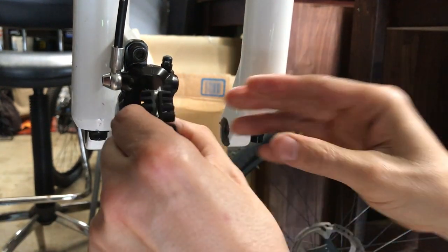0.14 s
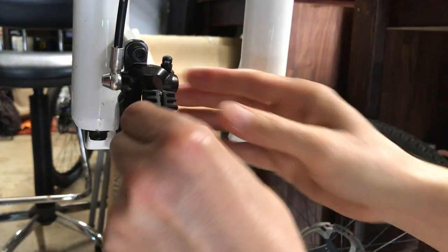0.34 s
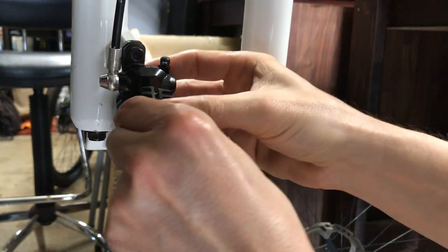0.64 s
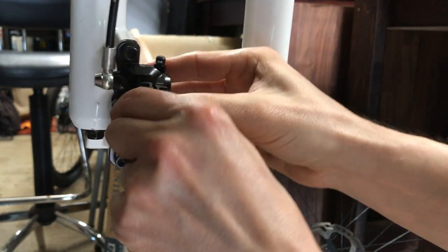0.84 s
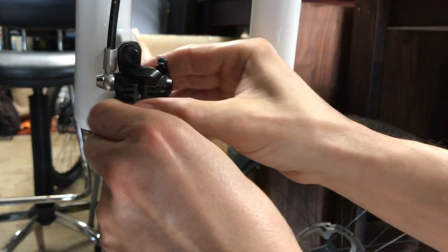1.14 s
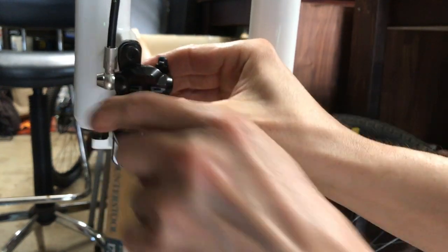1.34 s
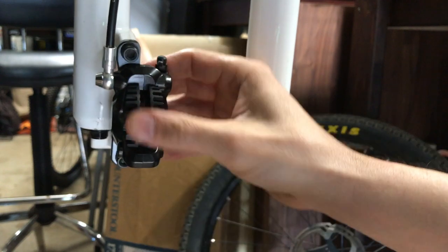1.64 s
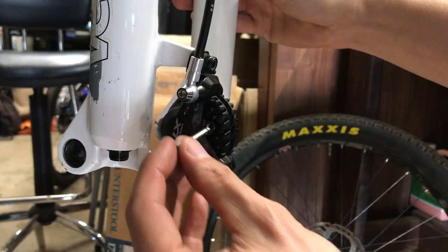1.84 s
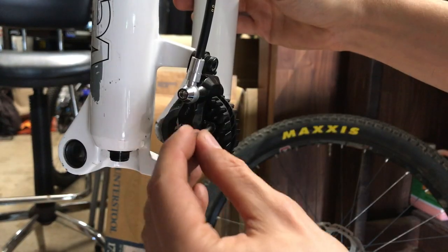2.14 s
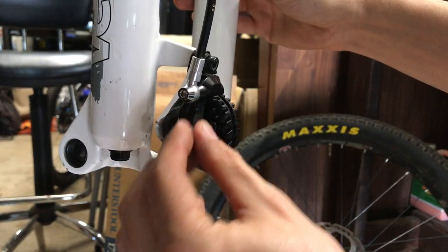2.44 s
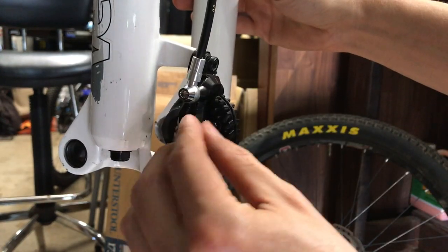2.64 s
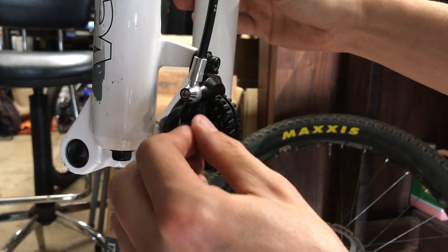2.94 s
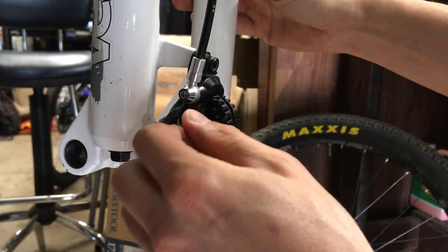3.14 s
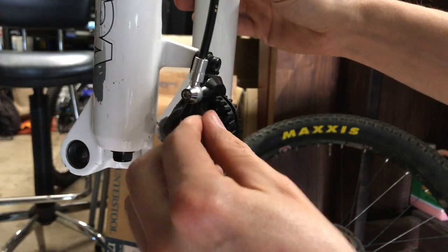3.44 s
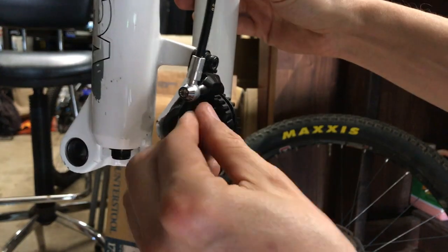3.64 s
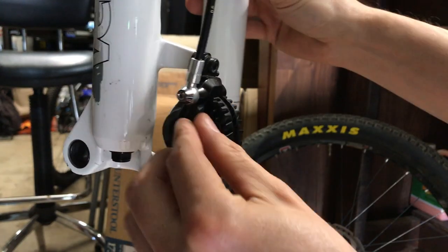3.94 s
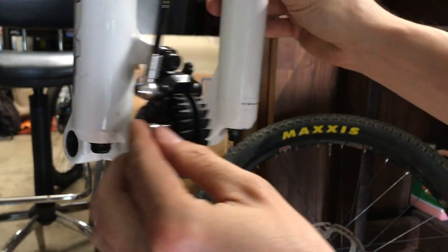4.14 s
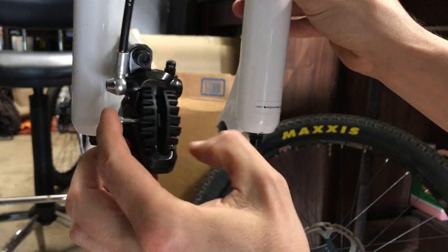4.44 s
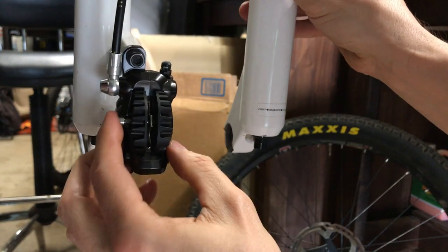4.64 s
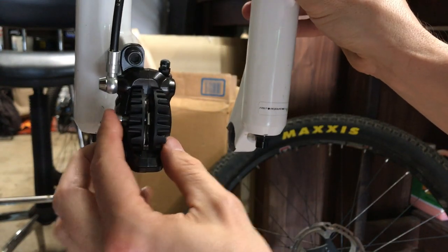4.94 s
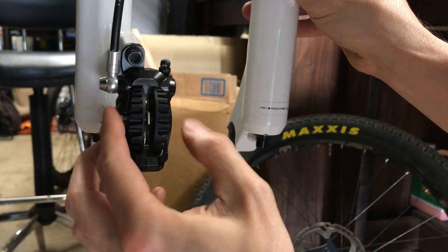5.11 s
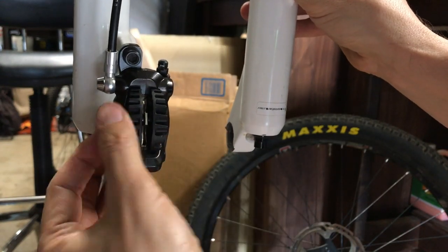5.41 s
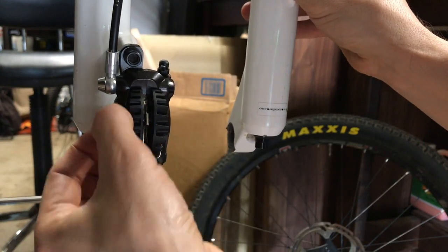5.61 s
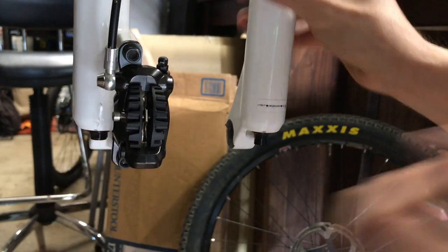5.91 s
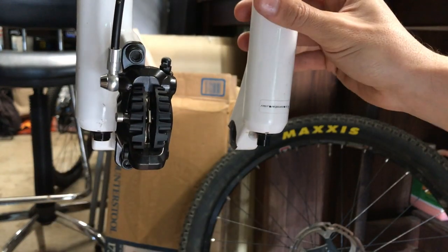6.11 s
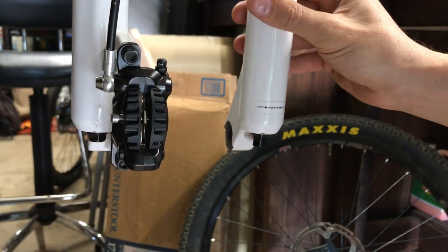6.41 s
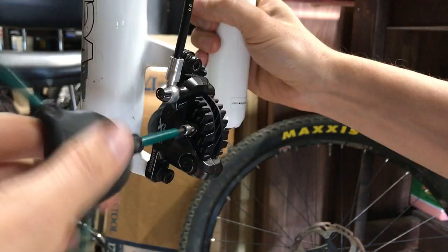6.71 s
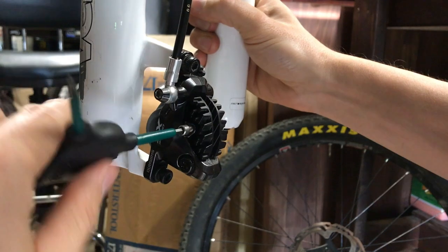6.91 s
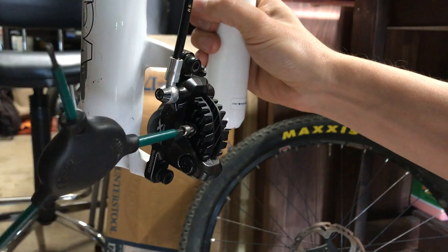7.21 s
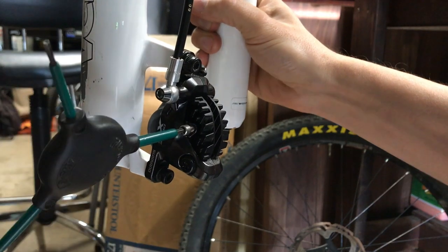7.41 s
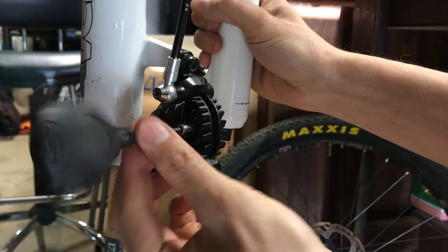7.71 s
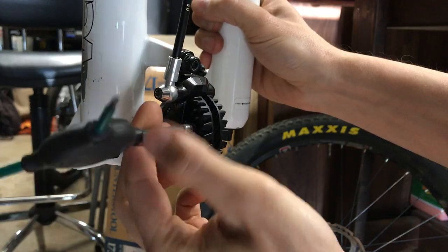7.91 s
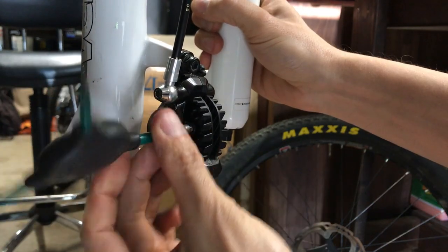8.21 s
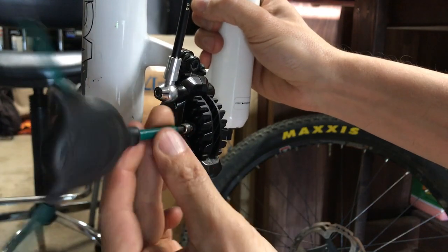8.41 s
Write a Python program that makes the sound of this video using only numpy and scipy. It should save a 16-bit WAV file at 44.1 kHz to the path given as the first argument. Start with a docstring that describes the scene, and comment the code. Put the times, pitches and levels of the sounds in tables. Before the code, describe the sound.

Metal-backed brake pads click and snap sharply into a bicycle caliper, then a small pin ticks in and a hex key turns faintly in a quiet workshop.

```python
"""Fitting bicycle brake pads

Steel-backed brake pads are pushed into a bicycle caliper, a retaining pin is slid in and a hex key turns it.
Each contact is a burst of tiny impacts exciting the short damped modes of caliper and fork; slides are dense
random grains through the same modes. A small workshop answers the contacts with a decaying tail of echoes.
Behind them lie filtered noises: air, hum, a far engine, hiss, faint tones and a dull knock on wood."""
import sys
import numpy as np
from scipy import signal
from scipy.fft import rfft, irfft, next_fast_len
from scipy.io import wavfile
from scipy.ndimage import uniform_filter1d

SR = 44100
rng = np.random.default_rng(int(sys.argv[2]) if len(sys.argv) > 2 else 0)


def master_out(mix):
    """Clip the mix to full scale and print it as 16-bit PCM to the path in sys.argv[1]."""
    frames = np.transpose(np.atleast_2d(mix))
    ceiling = np.clip(frames, -1, 1)
    pcm = np.round(ceiling * 32767).astype(np.int16)
    wavfile.write(sys.argv[1], SR, pcm)


N = 377496

# distant traffic: (time [s], swell of the low air noise [dB], level of the engine drone [dB])
TRAFFIC = [(0, 0, -78), (1, 0.5, -68.5), (3.2, 3, -81), (3.697, -1, -74.5), (6.601, -1.5, -83.5),
           (7.3, -1, -69.5), (7.799, 0, -73), (8.56, 1.5, -61.5)]


def gain_of(db):
    """Amplitude ratio of a level in decibels."""
    return 10 ** (np.asarray(db) / 20)


def evened(x):
    """Normalization to unit root-mean-square."""
    return x / np.sqrt(np.mean(x ** 2) + 1e-20)


def read(points, hz):
    """Interpolation along a logarithmic frequency axis."""
    f, value = np.transpose(points)
    return np.interp(np.log(hz + 1), np.log(f + 1), value)


def add(mix, start_s, sound):
    """Superposition: a sound is summed into the mix from its start time."""
    part = mix[round(start_s * SR):][:len(sound)]
    part += sound[:len(part)]


def resonate(x, hz, width_hz):
    """A damped resonator as one complex pole, of gain about 1 at its centre."""
    pole = np.exp((2j * np.pi * hz - np.pi * width_hz) / SR)
    return 2 * signal.lfilter([1 - abs(pole)], [1, -pole], x).real


def resonate_twice(x, hz, width_hz):
    """Two equal resonators in cascade, for steeper skirts."""
    return resonate(resonate(x, hz, width_hz), hz, width_hz)


def narrow_noise(bands):
    """Narrow-band noise: random excitation of sharp resonances gives fuzzy, wavering tones."""
    noise = rng.standard_normal(N)
    return sum(gain_of(db) * evened(resonate_twice(noise, hz, width_hz)) for hz, width_hz, db in bands)


def air():
    """Broadband noise from random short-time spectra, shaped in frequency; the low part swells with traffic."""
    # long-term spectrum of the air noise: (frequency [Hz], relative level per Hz [dB])
    air_spectrum = [(24, -40), (38, 1), (62, -0.5), (90, -10), (122, -4), (230, -11), (473, -19.5),
                    (830, -15), (1350, -19), (1900, -26.5), (3500, -33.5), (13000, -39), (16000, -45)]
    level_db, patch_db = -63.5, 0.55
    frames, hz = N // 256 + 5, np.fft.rfftfreq(1024, 1 / SR)
    real, imaginary, patches = rng.standard_normal((frames, 513, 3)).T
    patches = uniform_filter1d(patches, 12, 0)  # smoothed over frequency, then over time
    patches = evened(uniform_filter1d(patches, 14, 1))
    swell_db = np.interp(np.arange(frames) * 256 / SR, *np.transpose(TRAFFIC)[:2])
    low_share = 1 / (1 + (hz[:, None] / 2200) ** 4)
    shape_db = read(air_spectrum, hz)[:, None] + patch_db * patches + low_share * swell_db
    spectra = (real + 1j * imaginary) * gain_of(shape_db)
    return gain_of(level_db) * evened(signal.istft(spectra, nperseg=1024, noverlap=768)[1][:N])


def hum_and_whine():
    """Narrow-band noise: wavering machinery hum and a faint steady treble band."""
    # machinery: (centre [Hz], width of each resonator [Hz], level [dB])
    hum_bands = [(55, 27, -68.5), (118.7, 1.7, -70)]
    # treble band: (centre [Hz], width of each resonator [Hz], level [dB])
    whine_bands = [(13400, 450, -88.5)]
    return narrow_noise([*hum_bands, *whine_bands])


def drone():
    """Amplitude modulation of narrow-band noise: a far engine comes and goes."""
    # engine tones: (centre [Hz], width of each resonator [Hz], relative level [dB])
    drone_bands = [(159.85, 12, -1.5), (251, 5.7, -10)]
    time_s, _, db = np.transpose(TRAFFIC)
    return gain_of(np.interp(np.arange(N) / SR, time_s, db)) * narrow_noise(drone_bands)


def hiss():
    """Band-pass noise, gated: the treble hiss steps up for a while."""
    # (start [s], end [s], level before the edge fades [dB])
    hiss_spans = [(1.433, 1.751, -71.5), (2.903, 3.257, -71)]
    out = np.zeros(N)
    treble = signal.butter(2, [2500, 15000], "bandpass", fs=SR, output="sos")
    for start, end, db in hiss_spans:
        noise = signal.sosfilt(treble, rng.standard_normal(round((end - start) * SR)))
        add(out, start, gain_of(db) * evened(noise) * signal.windows.tukey(len(noise), .05))
    return out


def faint_tones():
    """Narrow-band noise under a swelling and fading envelope."""
    # squeak of the turning pin, far hum: (start [s], length [s], level before the fades [dB], centre [Hz])
    tone_list = [(5.92, .14, -85, 4680), (5.78, .36, -80, 722)]
    relative_width = .025  # of each resonator, as a share of its frequency
    out = np.zeros(N)
    for start, length_s, db, hz in tone_list:
        noise = rng.standard_normal(round(length_s * SR))
        tone = resonate_twice(noise, hz, relative_width * hz)
        add(out, start, gain_of(db) * evened(tone) * signal.windows.tukey(len(noise), .5))
    return out


def knock():
    """Modal decay under noise: a far, dull blow arrives smeared into a rattle in the resonances of wood."""
    # resonances of the wood: (centre [Hz], width of each resonator [Hz], relative level [dB])
    wood_modes = [(390, 62, 6), (506, 81, 10.5), (750, 280, 2), (1050, 1650, -8), (2026, 1150, -7),
                  (3560, 2500, -16)]
    start_s, level_db = 6.618, -46.5
    rise_s, hold_s, length_s = 0.0024, 0.023, 0.092
    fall_db_per_s = 176.5  # of the first resonance
    treble_fall = 0.38  # higher resonances fall faster, as this power of pitch
    out, t = np.zeros(N), np.arange(SR // 5) / SR
    noise = rng.standard_normal(len(t))
    fall_db = fall_db_per_s * np.maximum(t - hold_s, 0)
    wood = np.zeros(len(t))
    for hz, width_hz, db in wood_modes:
        mode_fall_db = fall_db * (hz / wood_modes[0][0]) ** treble_fall
        wood += gain_of(db - mode_fall_db) * resonate_twice(noise, hz, width_hz)
    wood = signal.lfilter(*signal.butter(2, 4230, fs=SR), wood)  # distance takes off the top
    wood /= np.sqrt(np.mean(wood[t < hold_s + rise_s] ** 2))
    stop_db = 1800 * np.maximum(t - length_s, 0)  # then it stops short
    add(out, start_s, np.minimum(t / rise_s, 1) * gain_of(level_db - stop_db) * wood)
    return out


def workshop(x):
    """Reverberation: convolution with sparse echoes of random sign, each band dying at its own rate."""
    # reverberation time: (frequency [Hz], t60 [s])
    room_t60 = [(500, 0.34), (8000, 0.19), (15000, 0.056)]
    uneven_db = 3  # shelves and boxes return the sound in patches
    taps = np.zeros(SR // 2)
    at = np.arange(160, SR // 2 - 20, 20)  # one echo in every 20 samples
    taps[at + rng.integers(0, 20, len(at))] = rng.choice([-1., 1.], len(at))
    hz, t, spectra = signal.stft(taps, SR, nperseg=128)
    patches = uniform_filter1d(rng.standard_normal(spectra.shape), size=2, axis=0)
    patches = evened(uniform_filter1d(patches, size=8, axis=1))
    decay_db = 60 * t / read(room_t60, hz)[:, None]
    tail = signal.istft(spectra * gain_of(uneven_db * patches - decay_db), SR, nperseg=128)[1]
    return signal.fftconvolve(x, tail / np.linalg.norm(tail))[:N]


def strike(low_db, treble_db, struck_hz, fork_db, damping=0.54):
    """Modal synthesis: a minimum-phase crack, favouring the region struck, excites decaying sine modes."""
    # caliper, pads and fork: (frequency before detuning [Hz], relative level [dB], t60 before damping [s])
    metal_modes = [(2070, -14, .095), (4740, -6, .03), (1380, -10, .022), (1640, -23, .08),
                   (2790, -16, .035), (3480, -10, .03), (3900, -8, .03), (6020, -5, .035), (7200, -5, .03),
                   (9200, -4, .03), (11300, -4, .025), (12100, -4, .025), (13800, -5, .02)]
    crack_db = 38  # the bare impact over the ring of the modes
    detune = .008  # each strike raises the modes by up to this share
    # the two pads make each mode a close, beating pair
    hz, db, t60 = np.transpose([*metal_modes, *metal_modes])[:, :, None]
    t = np.arange(4096) / SR
    db = db - 1.6 * abs(np.log2(hz / struck_hz))  # modes far from the struck region take less of the blow
    db = db + fork_db * (hz < 3000)
    decay_db = 60 * t * damping * (hz / 2000) ** 0.14 / t60
    detuned_hz = hz * (1 + detune * rng.uniform(0.11, 1, hz.shape))
    modes = gain_of(db - decay_db) * np.sin(2 * np.pi * detuned_hz * t)

    f = np.fft.rfftfreq(2 * len(t), 1 / SR)
    # small parts radiate little bass
    colour_db = read([(150, -38.0), (600, -22), (1000, low_db - 10.5), (1500, low_db), (2700, low_db - 3.5),
                      (4600, -3.6), (7500, -6.5), (10500, treble_db), (16000, treble_db - 9.0)], f)
    colour_db += 8. * np.exp(-(np.log((f + 1) / struck_hz) / .17) ** 2)
    colour_db -= 3.5 * np.maximum(np.log2((f + 1) / struck_hz), 0)  # a blow on a large part is duller
    log_gain = np.log(gain_of(np.r_[colour_db, colour_db[-2:0:-1]]))
    # minimum phase: nothing sounds before the blow
    crack = irfft(np.exp(np.conj(signal.hilbert(log_gain)))[:len(f)])[:len(t)]
    return gain_of(crack_db) * crack, signal.fftconvolve(crack, modes.sum(0))[:len(t)]


def slides():
    """Friction as dense random micro-impacts under the stroke; the fingers damp the modes."""
    # metal and fingers over metal: (start [s], length [s], level [dB], region rubbed most [Hz])
    slide_list = [(1.214, 0.069, -65, 6700), (1.312, 0.03, -60.5, 6500), (1.359, 0.017, -35, 5560),
                  (2.733, 0.035, -70, 4340), (3.133, 0.063, -70, 3415), (3.313, 0.037, -56, 4330),
                  (3.439, 0.016, -55, 4230), (3.991, 0.016, -64, 4130), (4.026, 0.086, -67, 11500),
                  (5.124, 0.021, -68.5, 9300), (5.742, 0.03, -76.5, 4760), (5.91, 0.18, -82.5, 12200),
                  (7.721, 0.18, -68, 4770), (8.289, 0.195, -69, 5170)]
    grains_per_s, low_db, treble_db, ring_db = 5800, 2, -1, 3
    out = np.zeros(N)
    for start, length_s, db, rubbed_hz in slide_list:
        length = round(length_s * SR)
        size, draw, wobble = rng.standard_normal(length), rng.random(length), rng.standard_normal(length)
        grip = gain_of(2.5 * evened(uniform_filter1d(wobble, 350)))  # the pressure wavers
        stroke = signal.windows.tukey(length, 0.73)
        grains = size * grip * (draw < grains_per_s / SR) * stroke
        crack, ring = strike(low_db, treble_db, rubbed_hz, 0, damping=1.6)
        rub = signal.fftconvolve(grains, crack + gain_of(ring_db) * ring)
        add(out, start, gain_of(db) * rub / np.sqrt(np.mean(rub[:length] ** 2)))
    return out


def fork_thud(blow_db):
    """A damped oscillator of sinking pitch: the fork answers a blow a moment later."""
    start_hz, t60_s, rise_s = 620, .016, .0014
    sag_per_s = 22  # the pitch sinks as it dies
    t = np.arange(4096) / SR
    envelope = (t / rise_s) ** 2 * gain_of(-60 * t / t60_s)
    thud = envelope * np.sin(2 * np.pi * start_hz * t / (1 + sag_per_s * t))
    return gain_of(-70 + 0.7379 * (blow_db + 44)) * thud  # softer than in proportion to the blow


def contacts():
    """Impact excitation: each contact chatters in a swelling, dying burst, and the walls return each blow."""
    # (time [s], level over the first 4 ms [dB], region struck most [Hz], treble of the crack [dB],
    #  ring of the fork below 3 kHz [dB])
    contact_list = [ (0.1746, -32.5, 1930, -14, -3.5), (.226, -41.5, 5970, -4, 0),
                    (.263, -40, 5170, -17, 15), (0.4134, -51, 2020, -12, 3),
                    (.451, -44.5, 10300, -14.5, 5.5), (0.868, -55, 6340, 4, 9),
                    (1.0158, -31, 5530, -8.5, -0.5), (1.2347, -50.5, 2050, -12, 5),
                    (1.281, -56, 6200, -13, -4), (1.3303, -35, 6350, -5, -2),
                    (1.3595, -29.5, 7240, -3, -23), (1.3715, -15.5, 5830, -8, -1.5),
                    (1.38, -31.5, 3787, -2.5, 8.5), (1.519, -48.5, 2860, -28.5, -4),
                    (1.9763, -44.5, 7260, -6, 1), (2.045, -55.5, 4880, 2.5, 1.5),
                    (2.155, -46, 5150, -2.5, 1), (2.166, -49.5, 4850, -8.5, 0),
                    (2.186, -53.5, 4720, -20.5, 2), (2.1985, -53, 4900, -4.5, -2.5),
                    (2.211, -54, 4000, -11.5, -0.5), (2.3774, -37, 12330, 0, 7),
                    (2.657, -40.5, 12200, -2, 8), (2.818, -53, 9500, 1, 10.5),
                    (2.84, -14.5, 8600, -3, -26.5), (2.845, -23, 5060, 4.5, -1),
                    (3.333, -43, 1400, 0.5, -8), (3.4552, -44.5, 1400, -5.5, -10),
                    (3.569, -41.5, 3710, 3.5, 8), (3.658, -50.5, 3950, -4, -4.5),
                    (3.681, -50.5, 2110, -5, 4), (3.7664, -57, 4110, 0, 0.5), (3.897, -29.5, 5140, 5.5, -3),
                    (4.06, -43, 12100, -4.5, -6), (4.241, -61, 5640, -1, -3.5), (4.4482, -40, 14200, -3, 5),
                    (4.5637, -26, 6200, 0.5, 4), (5.0218, -64, 1907, -3.5, -10),
                    (5.0506, -55.5, 5940, 0.5, 2), (5.119, -57, 4620, -24, -10),
                    (5.267, -64, 5470, 1, -0.5), (5.333, -64, 4630, -13, 7), (5.4781, -49, 4800, 7, -9.5),
                    (5.52, -64, 4820, -1.5, 0), (5.535, -67.5, 4800, -3, -3),
                    (5.552, -59.5, 4850, -15.5, -13.5), (5.587, -57.5, 5970, 0, -1),
                    (5.6485, -66, 4800, -9.5, -6.5), (5.7212, -68, 4740, -0.5, 0),
                    (6.784, -56, 1300, -28, 5.5), (7.038, -66.5, 4000, -20, -0.5),
                    (7.773, -53.5, 7440, 2, -1), (7.8628, -64, 4400, -15, 1),
                    (7.8816, -61.5, 4610, -10, 4.5), (7.9435, -60.5, 2100, -7, -5),
                    (7.9574, -61.5, 4850, -9.5, -1.5), (7.966, -65, 8900, 2, -5),
                    (8.093, -72.5, 5000, -14, -2.5), (8.1772, -63, 1470, -27, 7),
                    (8.4165, -53, 3500, 2.5, -2)]
    chatter_ms, chatter_rise_ms = 2.1, 0.82  # how long the parts rattle together
    far_ring_db, room_db = -5, -13.5  # ring against the crack at the walls; level of the reverberation
    near, cracks, ms = np.zeros(N), np.zeros(N), np.arange(600) * 1000 / SR
    chatter = (1 - np.exp(-ms / chatter_rise_ms)) * np.exp(-ms / chatter_ms)
    for start, db, struck_hz, treble_db, fork_db in contact_list:
        # less low ring for hard blows and for blows on the small bright parts
        low_db = -4.5 - 0.13 * (db + 45) - 0.5 * np.log2(struck_hz / 5000) + .3 * fork_db
        crack, ring = strike(low_db, treble_db, struck_hz, fork_db)
        blow = rng.standard_normal(len(ms)) * chatter
        hit = signal.fftconvolve(blow, crack + ring)
        hit *= gain_of(db) / np.sqrt(np.mean(hit[:176] ** 2))
        add(near, start, hit)
        add(near, start, fork_thud(db))
        far = crack + gain_of(far_ring_db) * ring
        add(cracks, start, far * np.linalg.norm(hit) / np.linalg.norm(far))
    return near + gain_of(room_db) * workshop(cracks)


def scene():
    """Superposition of the background and the handling sounds in one channel."""
    background = air() + hum_and_whine() + drone() + hiss() + faint_tones() + knock()
    return (background + slides() + contacts())[None]


def record(dry):
    """Linear filtering: the colour of the microphone, then the band limit."""
    # microphone response: (frequency [Hz], gain [dB])
    microphone = [(24, -13), (36, 2), (9600, -0.5), (10600, -4), (11500, 3), (13000, 2)]
    size = next_fast_len(N)
    response = gain_of(read(microphone, np.fft.rfftfreq(size, 1 / SR)))
    coloured = irfft(rfft(dry, size) * response, size)[:, :N]
    low_pass = signal.firwin(255, 16000, window=("kaiser", 9), fs=SR)
    return signal.oaconvolve(coloured, low_pass[None], "same")


dry = scene()
out = record(dry)
master_out(out)
```